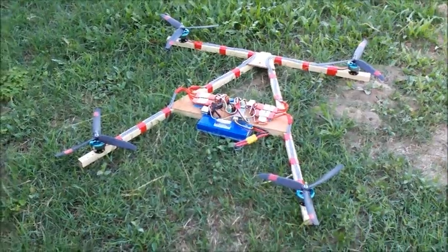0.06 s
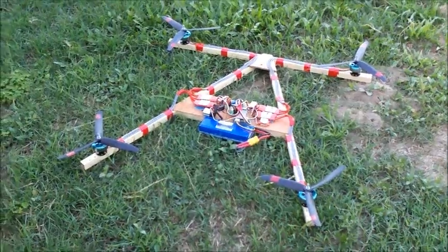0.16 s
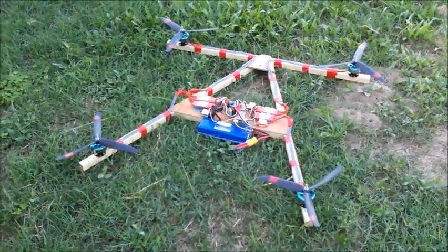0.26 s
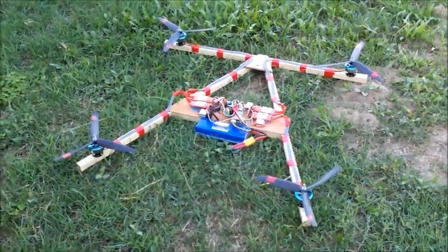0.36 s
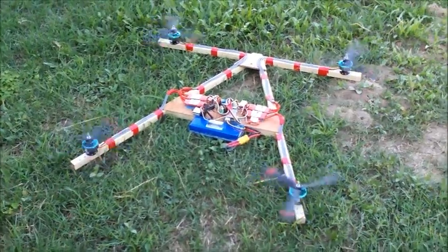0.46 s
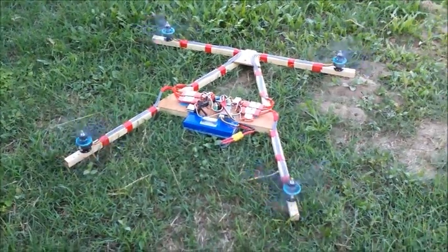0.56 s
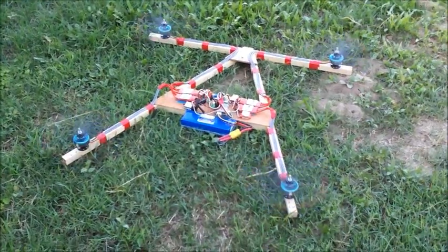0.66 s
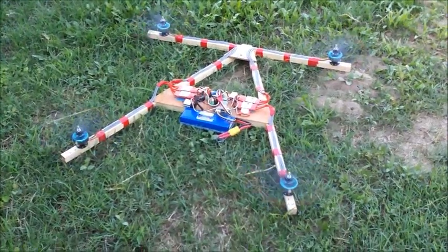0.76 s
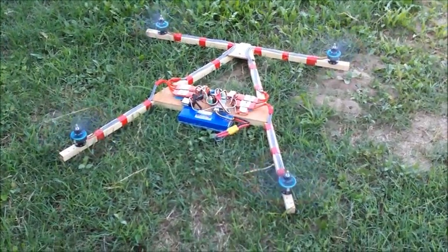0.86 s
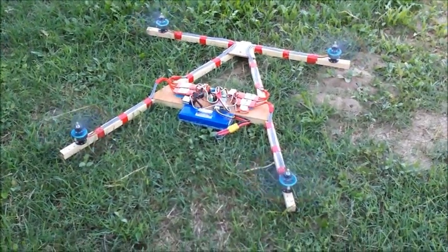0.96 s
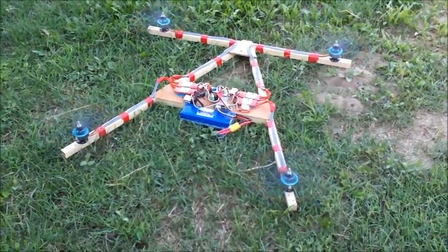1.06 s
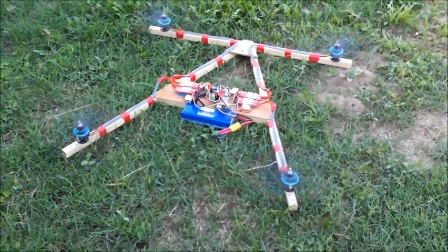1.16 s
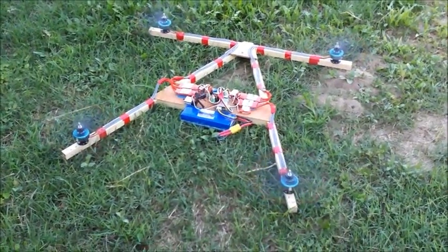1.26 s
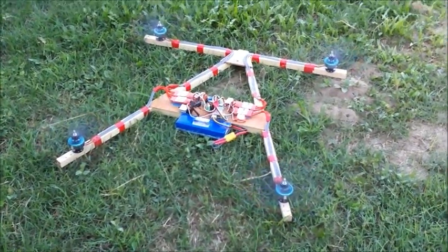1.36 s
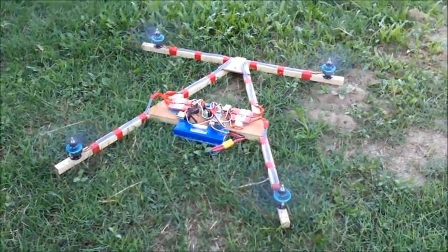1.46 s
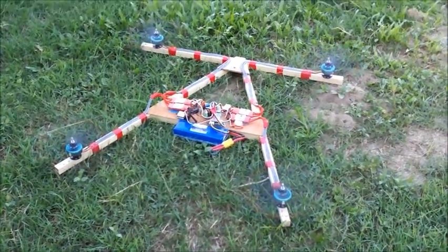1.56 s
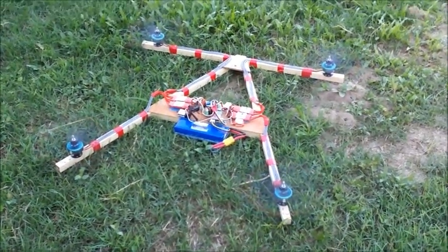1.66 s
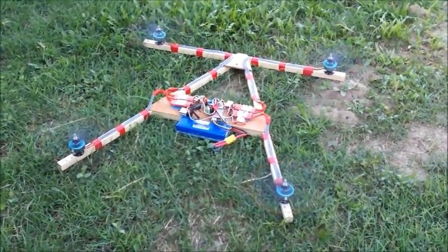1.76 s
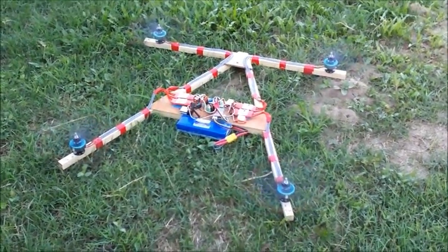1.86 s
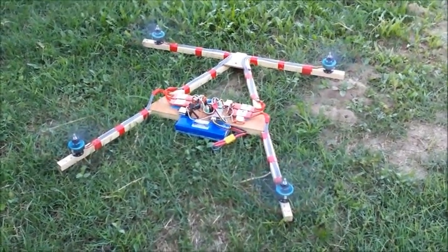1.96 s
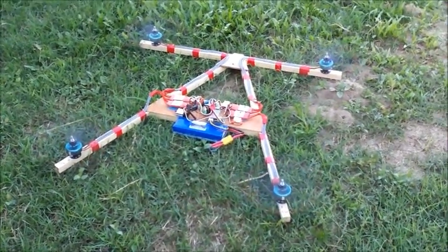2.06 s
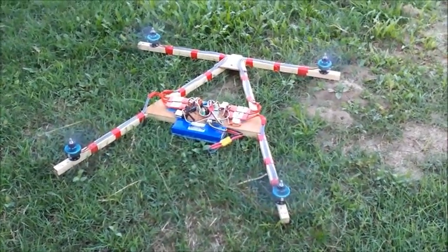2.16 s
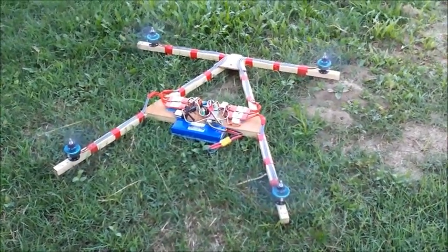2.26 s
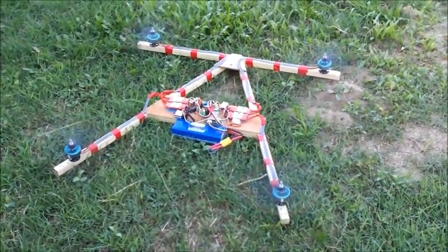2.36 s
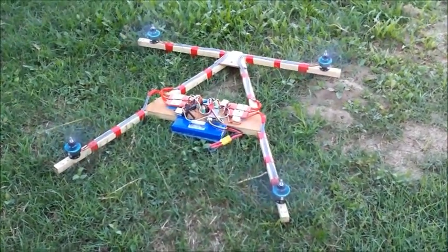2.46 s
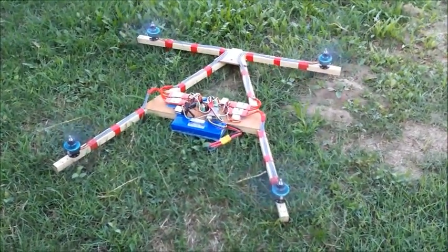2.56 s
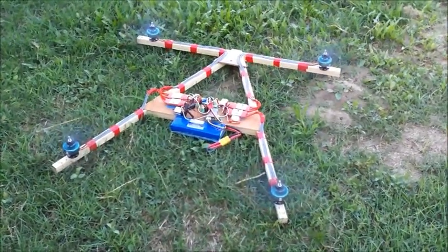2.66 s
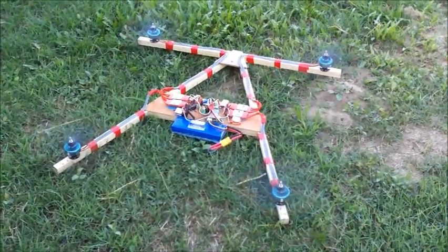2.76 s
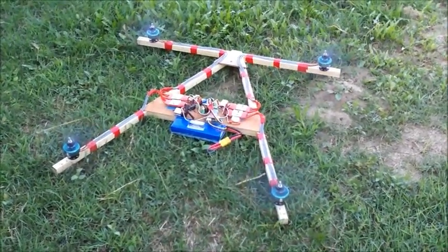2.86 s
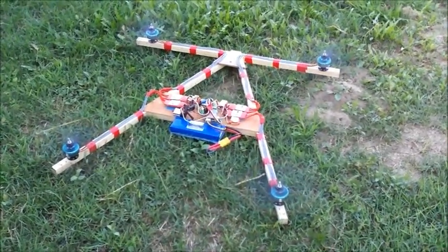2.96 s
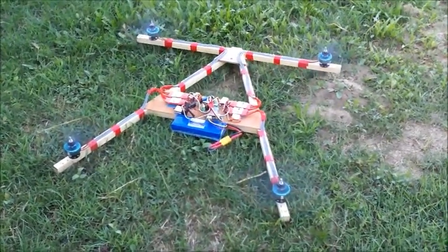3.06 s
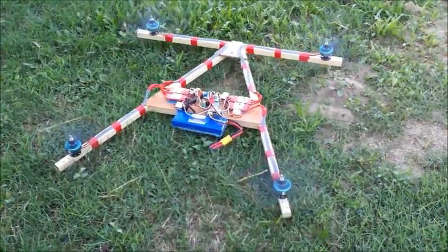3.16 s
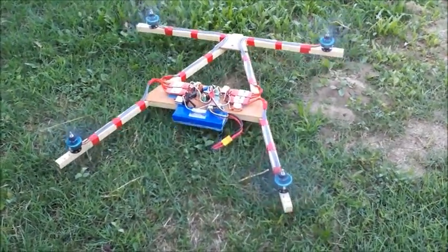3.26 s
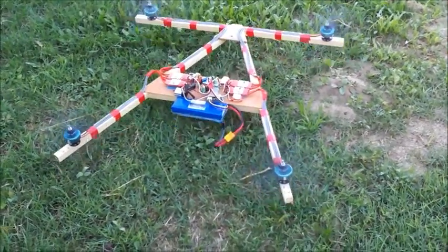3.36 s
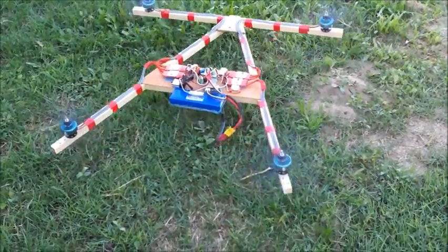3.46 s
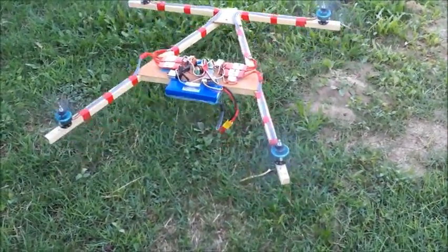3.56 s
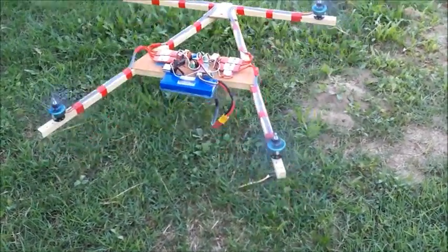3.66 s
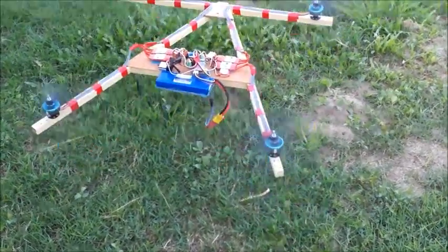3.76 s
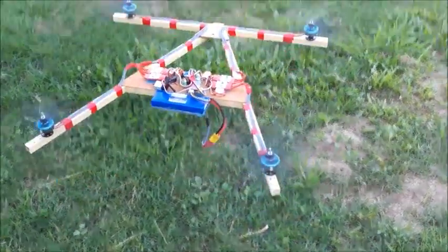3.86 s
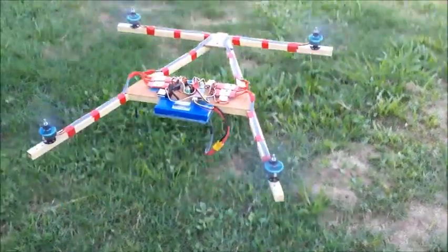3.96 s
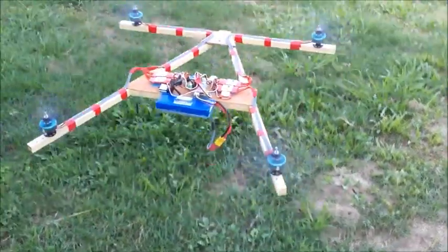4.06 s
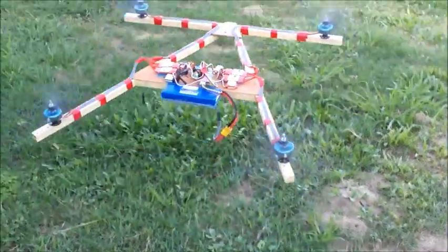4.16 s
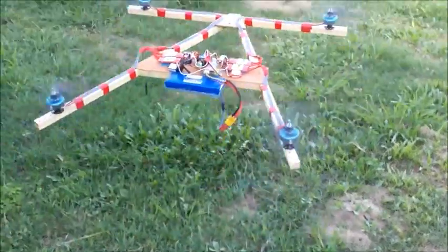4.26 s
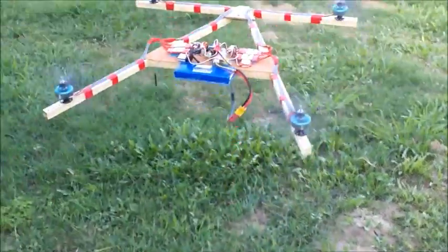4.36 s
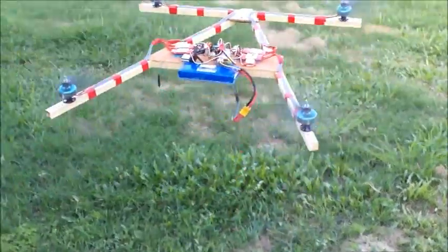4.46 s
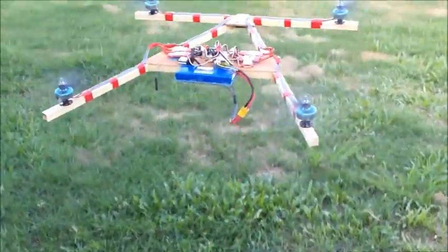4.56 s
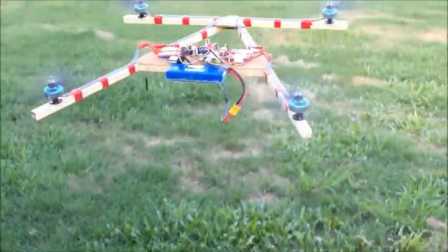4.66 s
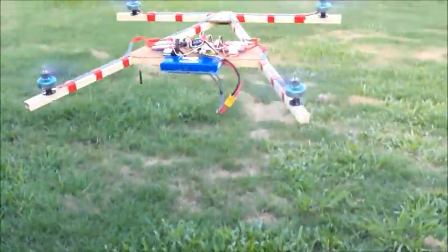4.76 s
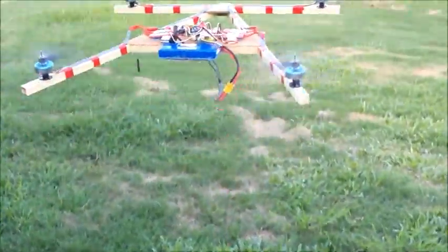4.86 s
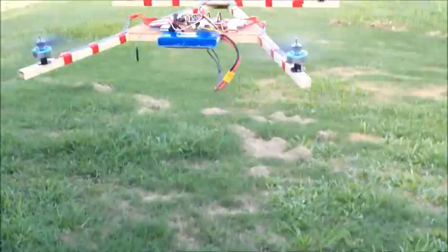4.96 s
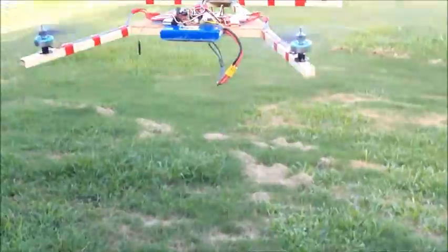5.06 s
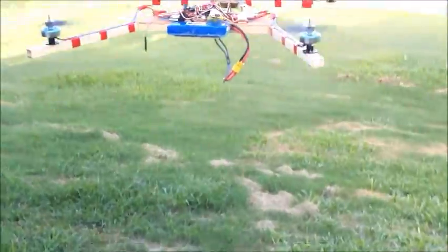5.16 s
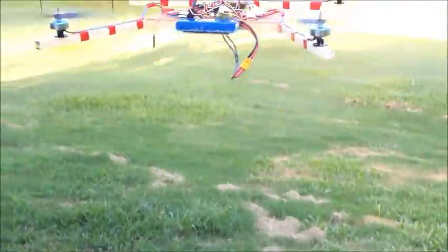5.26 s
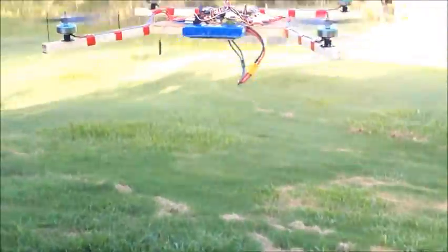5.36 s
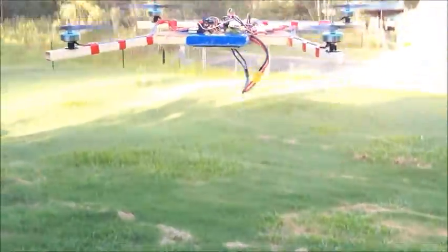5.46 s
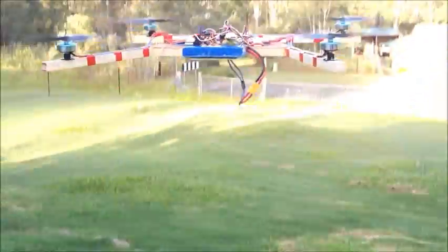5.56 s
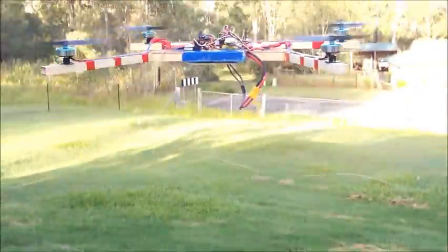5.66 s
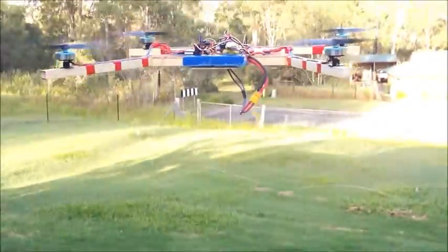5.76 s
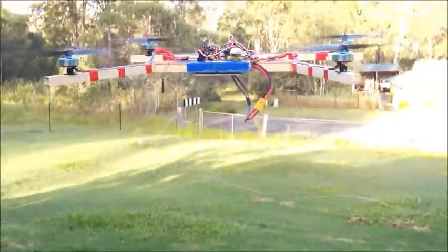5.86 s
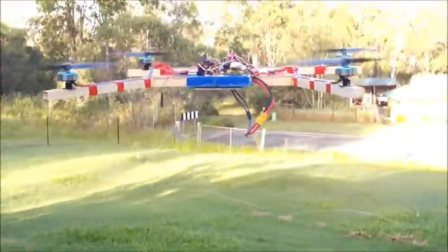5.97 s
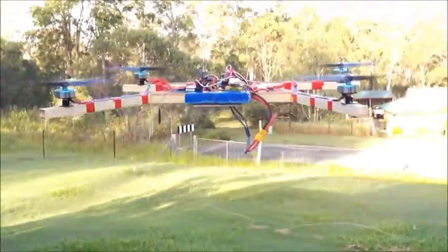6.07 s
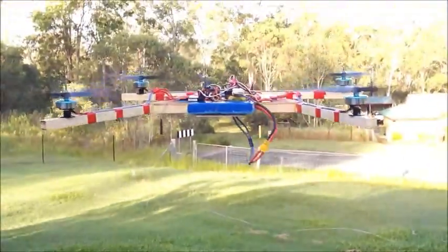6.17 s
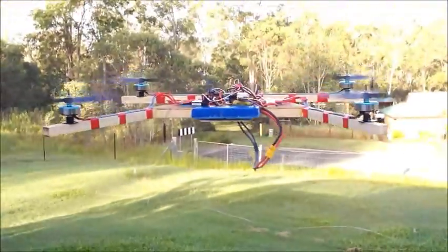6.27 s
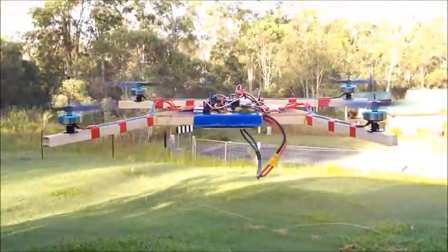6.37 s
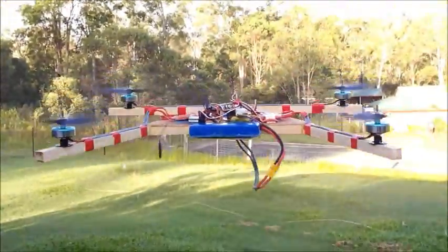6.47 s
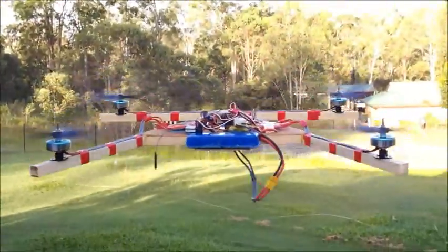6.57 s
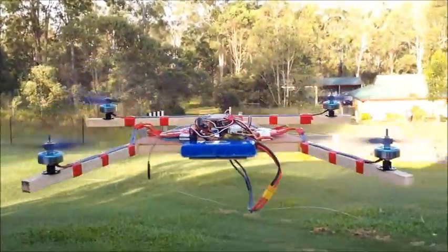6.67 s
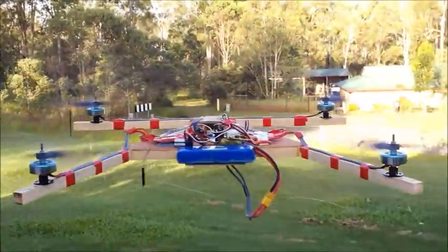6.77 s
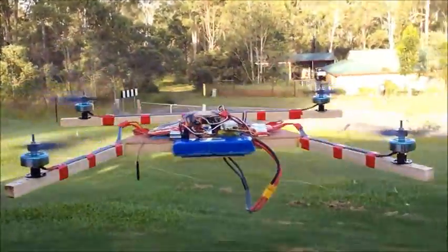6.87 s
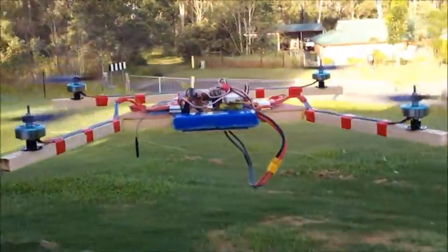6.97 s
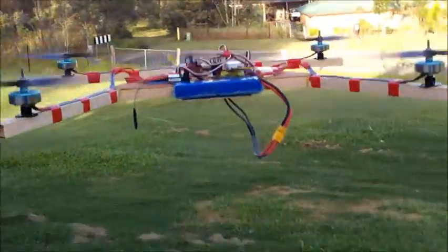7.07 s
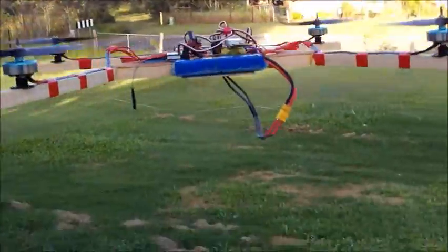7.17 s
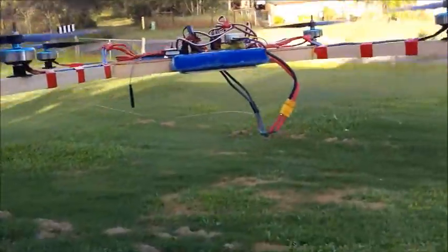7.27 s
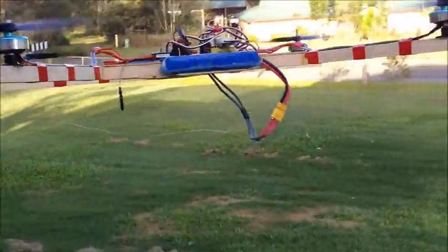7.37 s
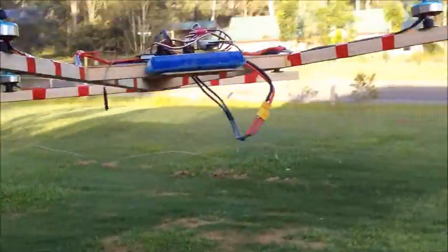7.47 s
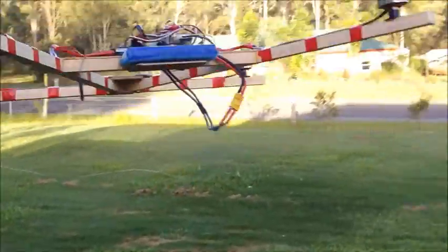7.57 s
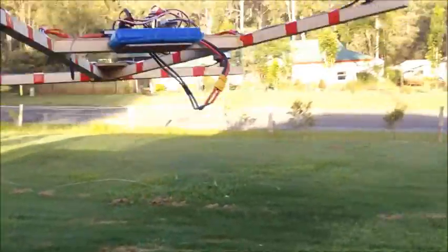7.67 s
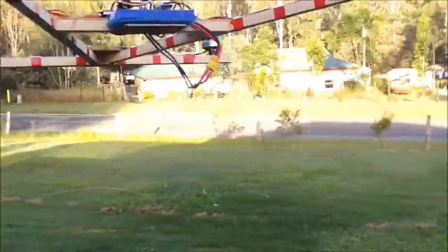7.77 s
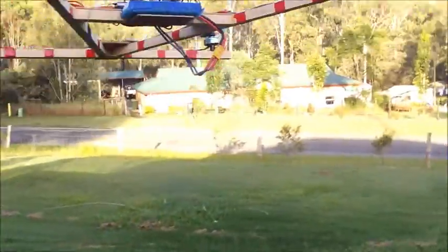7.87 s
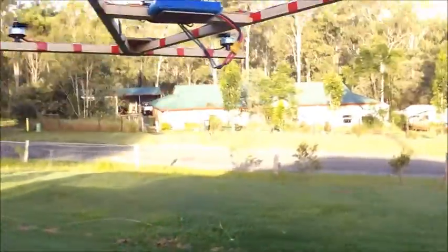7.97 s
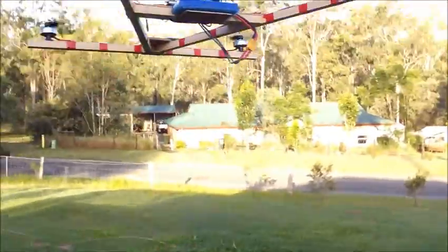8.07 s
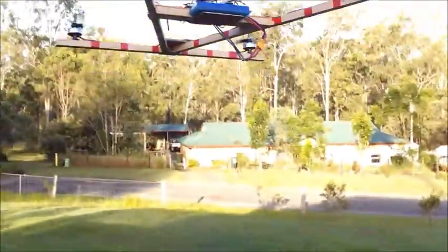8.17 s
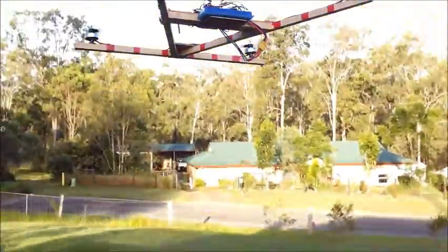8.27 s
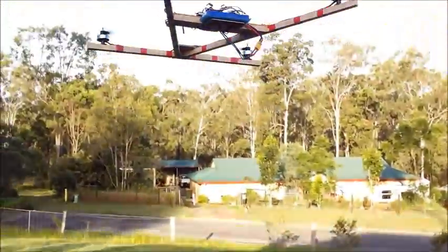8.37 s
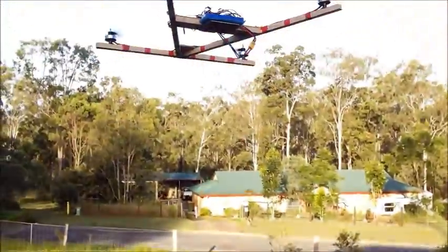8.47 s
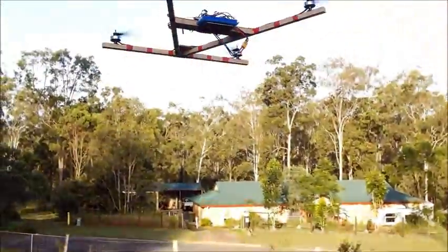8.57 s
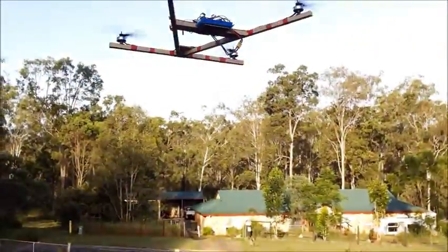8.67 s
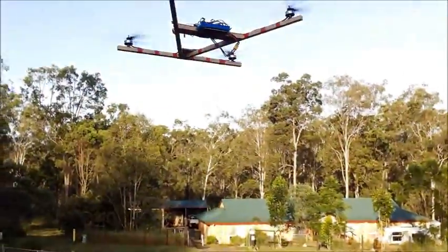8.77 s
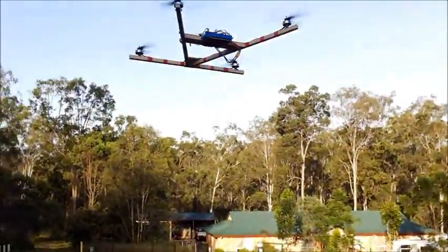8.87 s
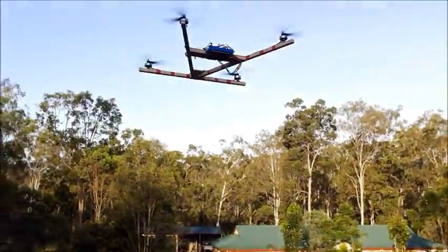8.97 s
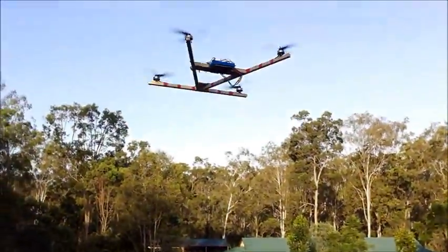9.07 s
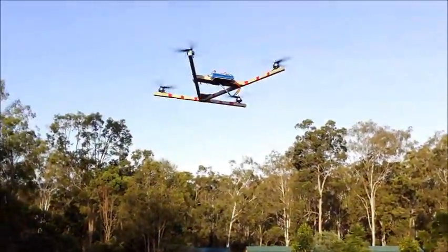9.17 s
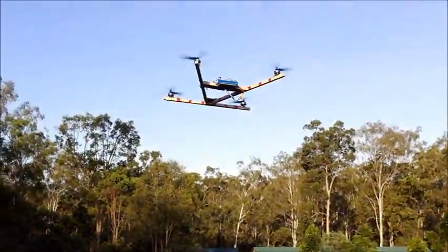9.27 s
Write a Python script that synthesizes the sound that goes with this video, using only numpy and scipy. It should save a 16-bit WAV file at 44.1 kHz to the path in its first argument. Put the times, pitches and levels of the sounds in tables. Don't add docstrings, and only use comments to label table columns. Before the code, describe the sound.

A quiet lawn with faint distant traffic and thin insects lasts about half a second. Four electric motors then start with a brief metallic ring and steady high whine; from 0.5 to 1.6 s the wooden frame gives dry knocks and one tiny squeak while blades tick against grass. Propeller hum and chopped air rise quickly around 2 s, with two sharper grass nicks, and swell to the loudest bright, rough roar at lift-off, about 3.3-4.2 s. The roar eases into a clearer, hollower hovering buzz by 5.4 s. Near 6.8 s the rotors surge and the drone comes close, motor bells ringing piercingly around 7.2-8 s, with faint low puffs of downwash. Rushing air peaks again near 7.9 s, then buzz and whine thin as it climbs away until 9.3 s. Ground reflections colour the sound; the nearby microphone has little bass.

```python
import sys
import numpy as np
from scipy import signal
from scipy.fft import rfft, irfft, next_fast_len
from scipy.io import wavfile
from scipy.ndimage import uniform_filter1d

SR = 44100
rng = np.random.default_rng(int(sys.argv[2]) if len(sys.argv) > 2 else 0)


def digitize_waveform(pressure):
    field = np.atleast_2d(pressure).T
    bounded = np.clip(field, -1, 1)
    quanta = np.round(bounded * 32767).astype(np.int16)
    wavfile.write(sys.argv[1], SR, quanta)


def nominal_scale(level):
    x = np.asarray(level, float) / 20
    return 10 ** x


N = 411453
TIME = np.arange(N) / SR

# (frequency [Hz], level [dB per Hz])
FIELD_SPECTRUM = [(15, -58), (25, -28), (79, -17), (113, -2), (147, -16), (183, -3.5), (226, -12), (494, 0),
                  (629, -0.5), (993, 3.5), (1840, -6), (2480, -6.5), (6180, -16), (8080, -7.5),
                  (15400, -28)]
# (frequency [Hz], width [Hz], level [dB])
INSECT_BANDS = [(7660, 30, -74), (7840, 40, -70), (7900, 40, -71), (4400, 400, -74), (5700, 250, -78)]
# (start [s], length [s], level [dB])
DOWNWASH_PUFFS = [
    (7.12, 0.087, -59),
    (7.3, 0.092, -63),
    (7.865, 0.089, -61),
]
# (time [s], peak [dB], pitch [Hz])
FRAME_KNOCKS = [(0.5226, -35, 1600), (0.5586, -29, 3250), (0.6376, -34, 1920), (0.6656, -45, 4300),
                (0.8944, -32, 1650), (1.0067, -24, 1520), (1.1204, -23.5, 1570), (1.3249, -25, 1560),
                (1.4044, -43, 1440), (1.517, -24, 1590), (1.588, -22, 1580), (1.6014, -25, 1560)]
# (time [s], peak [dB], pitch [Hz])
GRASS_NICKS = [(0.5384, -47, 8560), (0.6172, -48, 9300), (0.6376, -48, 9780), (0.6656, -43, 8600),
               (0.7065, -36, 9070), (0.8072, -46, 9400), (0.894, -46, 8680), (0.9125, -45, 9250),
               (0.9729, -50, 9260), (0.9968, -47, 8930), (1.8554, -32, 8660), (2.0, -29, 8540)]
# (start [s], end [s], pitch [Hz], level [dB])
FRAME_SQUEAK = (.78, .835, 1680, -46)
# (time [s], rotor one, two, three, four [turns per s])
SHAFT_SPEEDS = [(1.65, 55.8, 55.8, 55.8, 55.4), (2.1, 76, 78.7, 75, 79.6), (2.55, 79, 98, 77.8, 97),
                (2.7, 83, 95.7, 81.8, 94.7), (3.0, 83.9, 97.9, 84, 99.5), (3.2, 86.5, 102.5, 87.5, 106.2),
                (3.65, 86.5, 104, 88.3, 107.5), (4.15, 87, 103.7, 85, 102), (4.8, 89.3, 102.6, 88.2, 101),
                (5.1, 87, 101, 86, 104.3), (5.4, 81.5, 95.5, 80.4, 99.2), (6.4, 85.2, 94.6, 86.3, 95.5),
                (6.85, 99.5, 102.3, 98, 103.6), (7.2, 97.3, 98.8, 96.8, 97), (7.7, 96.8, 98, 95.7, 102),
                (8.0, 95.5, 101.5, 94.6, 101.5), (8.6, 95.5, 97.3, 95, 102.3), (9.33, 90, 102.2, 92, 98.8)]
IDLE_TRIM_SHARE = [0, .02, .009, 0]
# (start [s], length [s], rotor [index], extra speed [turns per s])
LEVELLING_NUDGES = [
    (3.7, .3, 1, 3.5),
    (4.14, .42, 3, 3),
    (5.93, .33, 1, 2),
    (7.33, .25, 0, 4),
    (7.75, .32, 0, 4),
    (8.04, .42, 1, 4.4),
    (8.04, .52, 3, 5.7),
    (8.35, .2, 0, -2.5),
]
# (time [s], bell ring [dB], switching whine [dB])
MOTOR_LEVELS = [(0.47, -69, -48), (0.54, -33, -48), (0.81, -50.5, -47.5), (0.91, -38.5, -47),
                (1.01, -44, -45.5), (1.53, -41, -44), (1.9, -35, -38.5), (3.05, -52, -43.5),
                (3.33, -32.5, -40), (4.94, -34.5, -40), (5.1, -32, -44), (6.6, -37, -41),
                (6.7, -33.5, -38.5), (7.5, -29, -41.5), (7.75, -32.5, -37), (8.1, -36.5, -52),
                (8.55, -36.5, -50), (9.33, -41, -53)]
MOTOR_LINES = [(1, -14), (1, 14), (1, 0), (1, -28), (1, -56), (2, -14), (0, 14), (0, 28), (0, 42), (0, 56),
               (0, 70)]
# (motors one to three [dB], motor four [dB])
MOTOR_LINE_LEVELS = [(0, -4), (-2, -6), (-8, -9), (-14, -30), (-13, -34), (-15, -30), (-8, -7), (-7, -34),
                     (-30, -8), (-18, -18), (-24, -24)]
PART_TIME_LINES = {14: (4.2, 99), 28: (.95, 1.6), 42: (.55, .86)}
MOTOR_NEARNESS = [0, -5, -10, 0]
# (frequency [Hz], width [Hz], level [dB])
BELL_MODES = [(5720, 170, 0), (5500, 220, -4), (6260, 200, -20)]
# (time [s], peak [dB])
BELL_FLARES = [(3.1068, -18), (4.3904, -22), (4.9896, -18), (6.6593, -31), (6.8608, -18), (7.1492, -17),
               (7.2529, -12), (7.3731, -13.5), (7.5393, -19), (7.7478, -12.5), (8.0441, -14),
               (8.4033, -19.5), (9.2963, -30)]
# (time [s], air rush [dB], lean of the frame towards rotors two and four [dB])
PROPELLER_LEVELS = [(0.45, -60, 0), (0.55, -43, -1), (0.62, -52.5, 1), (1.14, -42, -2.5), (1.49, -40.5, 1),
                    (2.13, -33, 1.5), (2.6, -29, -4.5), (3.12, -26.5, -1.5), (3.39, -22, 3.5),
                    (4.16, -24, 0), (4.85, -31.5, 5), (5.39, -38, -2.5), (6.46, -38, 0), (6.88, -33.5, 2),
                    (7.42, -33.5, 3.2), (7.85, -27, 5.5), (8.83, -42.5, -0.5), (9.33, -47, -1.5)]
# (frequency [Hz], level [dB per Hz])
RUSH_SPECTRUM = [(71, -65), (120, -48), (230, -38), (287, -27), (440, -25.5), (585, -17), (635, -18),
                 (762, -7), (1430, -4.5), (4550, -1), (5690, 3), (7120, 0.5), (10700, -1), (15400, -6.5)]
# (frequency [Hz], level [dB])
BLADE_TONE_LEVELS = [(150, -43), (300, -23), (600, -10.5), (900, -8), (1500, -9), (2000, -10),
                     (2700, -11.5)]
BLADE_NEARNESS = [-1, -2.5, -4.0, -2.5]
# (time [s], extra path [ms], echo [dB])
GROUND_ECHO = [(0, 0.043, -30), (3.0, 0.16, -26), (3.4, 0.13, -20), (3.7, 0.5, -14), (4.2, 0.73, -15),
               (5, 1.05, -17), (6, 1.39, -10), (7, 1.23, -12.5), (8, 1.226, -5), (9.33, 1.21, -4.5)]


def rms_one(x):
    return x / np.sqrt(np.mean(x ** 2) + 1e-20)


def in_time(rows):
    s, *columns = np.transpose(rows)
    return np.array([np.interp(TIME, s, c) for c in columns])


def at_hz(points, hz):
    table_hz, table_db = np.transpose(points)
    return np.interp(np.log(hz), np.log(table_hz), table_db)


def gate(start, end, fade):
    return np.clip(np.minimum(TIME - start, end - TIME) / fade, 0, 1)


def drift(rate, step=1):
    r = np.exp(-64 * np.pi * rate / SR)
    noise = rng.standard_normal(N // 32 + 1502)
    slow = signal.lfilter([1], [1, -2 * r, r * r], noise)[1500:]
    return np.interp(np.arange(0, N, step) / 32, np.arange(len(slow)), rms_one(slow))


def coloured(x, spectrum):
    size = next_fast_len(N)
    hz = np.maximum(np.fft.rfftfreq(size, 1 / SR), 1)
    return irfft(rfft(x, size) * nominal_scale(at_hz(spectrum, hz)), size)[:N]


def band(x, low, high, order=2):
    return signal.sosfilt(signal.butter(order, [low, high], "band", fs=SR, output="sos"), x)


def resonate(x, hz, width):
    r = np.exp(-np.pi * width / SR)
    feedback = [1, -2 * r * np.cos(2 * np.pi * hz / SR), r * r]
    return signal.lfilter((1 - r * r) / 2 * np.array([1, 0, -1]), feedback, x)


def resonate_twice(x, hz, width):
    return resonate(resonate(x, hz, width), hz, width)


def field():
    traffic = rms_one(coloured(rng.standard_normal(N), FIELD_SPECTRUM))
    out = nominal_scale(-55.5 + 1.0 * drift(11.0)) * traffic
    for hz, width, db in INSECT_BANDS:
        out = out + nominal_scale(db) * rms_one(resonate_twice(rng.standard_normal(N), hz, width))
    puff = 0
    for s, length, db in DOWNWASH_PUFFS:
        half = length / 2
        puff = puff + nominal_scale(db) * np.exp(-((TIME - s - half) / half) ** 2)
    return out + puff * rms_one(band(rng.standard_normal(N), 55, 190))


def squeak():
    start, end, hz, db = FRAME_SQUEAK
    return nominal_scale(db) * gate(start, end, 0.0033) * np.sin(2 * np.pi * hz * TIME)


def taps(events, cycles, gain_db):
    out, t = np.zeros(N), np.arange(900) / SR
    for s, db, hz in events:
        partials = [(0.56, 1.02), (0.18, 1.04), (0.19, 1.05)]
        ring = sum(g * np.sin(2 * np.pi * ratio * hz * t) for g, ratio in partials)
        ring = ring * np.exp(-np.log(1000) * t * hz / cycles)
        ring[170:] += 0.98 * ring[:-170]
        out[round(s * SR):][:900] += nominal_scale(db + gain_db) * ring
    return out


def shafts():
    idle = 58 * (1 - np.exp(-np.maximum(TIME - .455, 0) / .44))
    since = np.maximum(TIME - .49, 0)
    eager = 59 * since / (since + .047) - 4.5 * gate(1.2, 99, .3)
    speed = np.where(TIME < SHAFT_SPEEDS[0][0], [idle, idle, idle, eager], in_time(SHAFT_SPEEDS))
    speed = uniform_filter1d(speed, size=2200, axis=1)
    for s, length, rotor, extra in LEVELLING_NUDGES:
        speed[rotor] += extra * gate(s, s + length, .06)
    speed = speed * (1 + np.c_[IDLE_TRIM_SHARE] * np.clip((70 - speed) / 15, 0, 1))
    speed = speed * (1 + .0035 * np.array([drift(6) for _ in speed]))
    return speed, np.cumsum(speed, axis=1) / SR + rng.random((4, 1))


def bell_level():
    rise_s, fall_s, gain_db = 0.012, 0.037, -4.5
    power, age = nominal_scale(2 * in_time(MOTOR_LEVELS)[0]), TIME[:SR // 4]
    shape = np.minimum(age / rise_s, 1) * np.exp(-2 * age / fall_s)
    for s, db in BELL_FLARES:
        part = power[round(s * SR):][:len(age)]
        part += nominal_scale(2 * (db + gain_db)) * shape[:len(part)]
    return 10 * np.log10(power)


def motor_lines(speed, turns):
    switch_hz = 7640
    whine = slots = 0
    fade = nominal_scale(-.11 * speed)
    for (m, order), levels_db in zip(MOTOR_LINES, MOTOR_LINE_LEVELS):
        for k, angle in enumerate(turns):
            level_db = levels_db[k // 3]
            if level_db < -25:
                continue
            phase = m * switch_hz * TIME + order * angle + rng.random()
            line = nominal_scale(level_db + MOTOR_NEARNESS[k]) * np.sin(2 * np.pi * phase)
            if abs(order) > 50:
                slots = slots + line
            elif m == 0:
                whine = whine + line * gate(*PART_TIME_LINES[order], .05) * nominal_scale(2 * drift(25))
            else:
                lowest = (m, order) == MOTOR_LINES[0]
                whine = whine + line * (1 if lowest else fade[k])
    return whine, slots


def motors(speed, turns, bell_db):
    whine, slots = motor_lines(speed, turns)
    ticks = sum(np.diff(np.floor(a), prepend=0) * nominal_scale(1.8 * drift(12)) for a in turns)
    hiss = rms_one(ticks) + 0.32 * rng.standard_normal(N)
    ring = rms_one(sum(nominal_scale(db) * resonate_twice(hiss, hz, width) for hz, width, db in BELL_MODES))
    drive = nominal_scale(8) * slots * nominal_scale(4 * drift(30))
    flare = sum(nominal_scale(db) * resonate_twice(drive, hz, 2.5 * width) for hz, width, db in BELL_MODES[:2])
    whine_db = in_time(MOTOR_LEVELS)[1]
    bell = nominal_scale(bell_db) * (nominal_scale(-5.5) * ring + flare)
    return gate(.485, 99, .03) * (bell + nominal_scale(whine_db) * whine)


def whistle(speed):
    order, best_hz, reach_hz, wander_hz = 56, 5790, 170, 30
    out = 0
    for k, turning in enumerate(speed[1::2]):
        hz = order * turning + wander_hz * drift(7)
        near = 1 / (1 + ((hz - best_hz) / reach_hz) ** 2)
        level_db = -4 * k + 2.5 * drift(11)
        out = out + near * nominal_scale(level_db) * np.sin(2 * np.pi * np.cumsum(hz) / SR)
    return gate(4.0, 8.95, .5) * nominal_scale(in_time(MOTOR_LEVELS)[0] + 3) * out


def blade_tones(speed, turns, bass_db, pair_db, second_db, rough):
    step, out = 8, 0
    off_blade_db = -15.5
    rough = rough[::step]
    for k in range(len(speed)):
        turning = speed[k, ::step]
        angle = turns[k, ::step] + rough * .024 * drift(14, step)
        load_db = BLADE_NEARNESS[k] + pair_db[k % 2, ::step] + .16 * np.minimum(turning - 75, 0)
        for order in range(1, 25):
            hz = np.maximum(order * turning, 1)
            db = at_hz(BLADE_TONE_LEVELS, hz) + load_db + off_blade_db * (order % 3 > 0)
            db = db + bass_db[::step] * (order < 5) + second_db[::step] * (order == 6)
            db = db + rough * 5.5 * drift(8 + order, step)
            out = out + nominal_scale(db) * np.sin(2 * np.pi * (order * angle + rng.random()))
    return signal.resample_poly(out, step, 1)[:N]


def air_rush(turns, bright_db, bass_db):
    chop, patchy_db = .6, .5
    sweep = sum((1 + chop * np.cos(2 * np.pi * 3 * a)) * rng.standard_normal(N) for a in turns)
    body = coloured(sweep * nominal_scale(0.28 * drift(89)), RUSH_SPECTRUM)
    body = body / np.std(band(body, 900, 4800))
    edges = [60, 500, 1000, 2000, 4000, 8000, 18000]
    out, together = 0, drift(5)
    for k, (low, high) in enumerate(zip(edges, edges[1:])):
        lean = np.clip(np.log2(high / 3000) / 2.26, 0, 1)
        gain_db = lean * bright_db + bass_db * (k == 0) + patchy_db * (together + 1.0 * drift(6))
        out = out + nominal_scale(gain_db) * band(body, low, high) * (-1) ** k
    return out


def ground(x):
    lag_ms, echo_db = in_time(GROUND_ECHO)
    dull = signal.lfilter(*signal.butter(2, 2600, fs=SR), x)
    lag_s = lag_ms * (1 + 0.039 * drift(4.3)) / 1000
    echo = nominal_scale(echo_db) * np.interp(TIME - lag_s, TIME, dull)
    return (x + echo) / np.sqrt(1 + 1.1 * nominal_scale(2 * echo_db))


def propellers(speed, turns):
    rush_db, lean_db = in_time(PROPELLER_LEVELS)
    height_ms = in_time(GROUND_ECHO)[0]
    lacking = np.minimum(speed[0] - 80, 0)
    louder = rush_db + 33
    above = gate(7.3, 99, .8)
    bright_db = -10 + 0.27 * lacking - 0.34 * louder + 0.79 * height_ms + 4 * above
    bass_db = 1 + .15 * lacking + 0.02 * louder + 7.2 * height_ms - 3.5 * above
    pair_db = -6.5 - .2 * louder - 0.5 * above + lean_db * np.c_[[-1, 1]]
    second_db = 2.5 * height_ms * (1 - above)
    rough = .8 - .28 * height_ms
    out = air_rush(turns, bright_db, bass_db) + blade_tones(speed, turns, bass_db, pair_db, second_db, rough)
    out = out - 0.66 * above * resonate(out, 7900, 1400)
    return ground(nominal_scale(rush_db) * np.clip((TIME - .48) / 0.079, 0, 1) * out)


def scene():
    speed, turns = shafts()
    knocks = band(taps(FRAME_KNOCKS, 13, -.5), 700, 6000)
    mono = field() + squeak() + knocks + taps(GRASS_NICKS, 22, 6.6)
    mono = mono + motors(speed, turns, bell_level()) + whistle(speed) + propellers(speed, turns)
    return np.array([mono, mono])


def band_limit(x):
    return signal.sosfilt(signal.butter(12, 15600, fs=SR, output="sos"), x)


def record(dry):
    side = nominal_scale(-76.5) * rms_one(band(rng.standard_normal(N), 300, 6700))
    slip_count, slip_db = 20, -5
    for k, (late, pitch) in enumerate(rng.random((slip_count, 2))):
        at = round((1 + 8 * ((k + late) / slip_count) ** 1.5) * SR)
        low = 4200 * 3.2 ** pitch
        high = low * 1.3
        part = slice(at - 1024, at + 1024)
        level = np.std(band(dry[0, part], low, high, order=4))
        slip = rms_one(band(rng.standard_normal(2048), low, high, order=4))
        side[part] += nominal_scale(slip_db) * level * np.hanning(2048) * slip
    steep_top = signal.cheby2(14, 60, 15640, fs=SR, output="sos")
    mix = signal.sosfilt(steep_top, dry + side * np.c_[[1, -1]])
    return band_limit(mix)


dry = scene()
out = record(dry)
digitize_waveform(out)
```